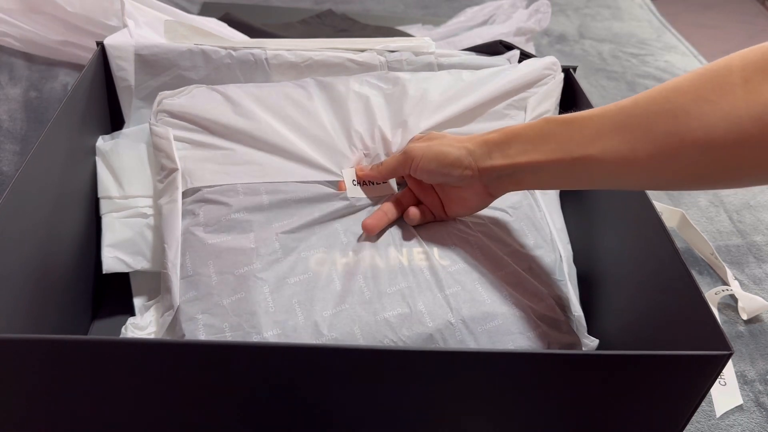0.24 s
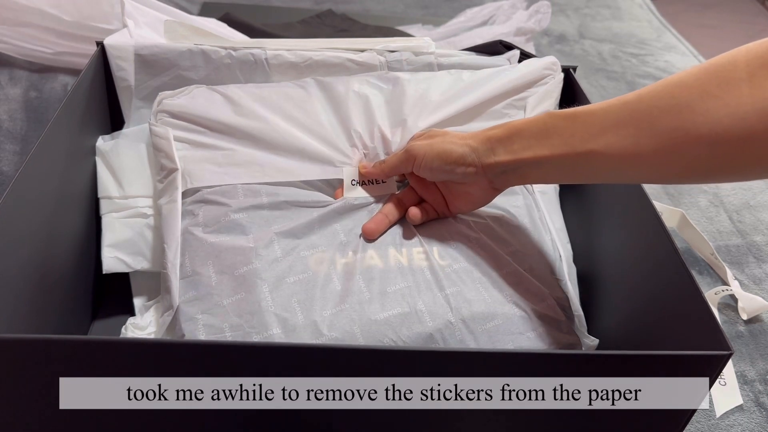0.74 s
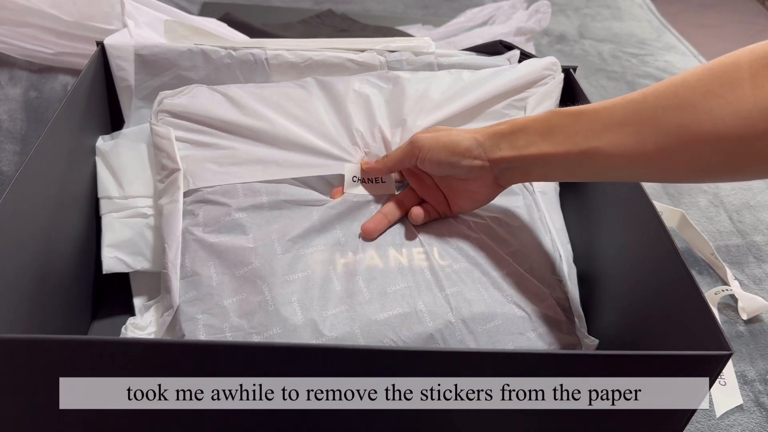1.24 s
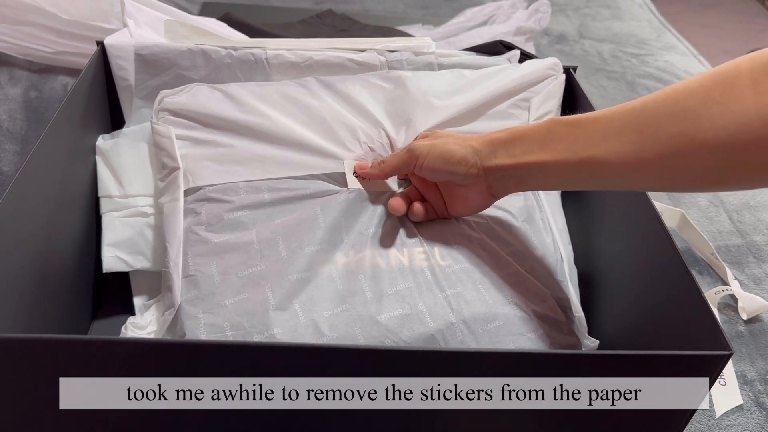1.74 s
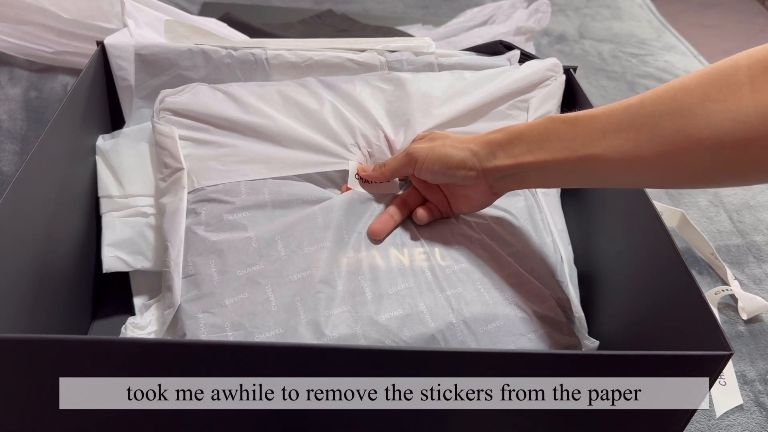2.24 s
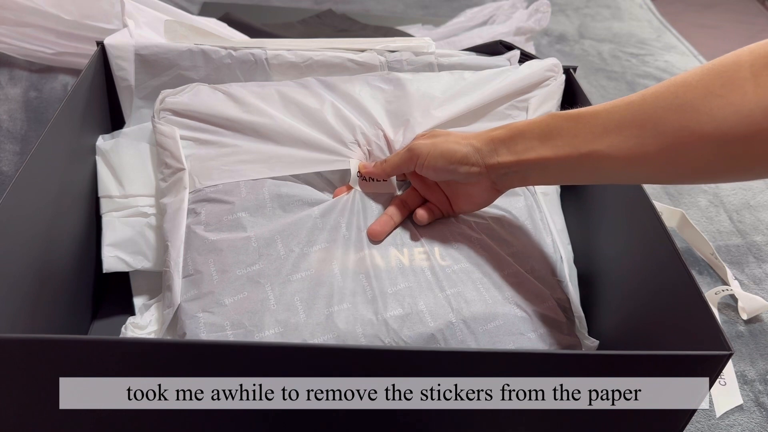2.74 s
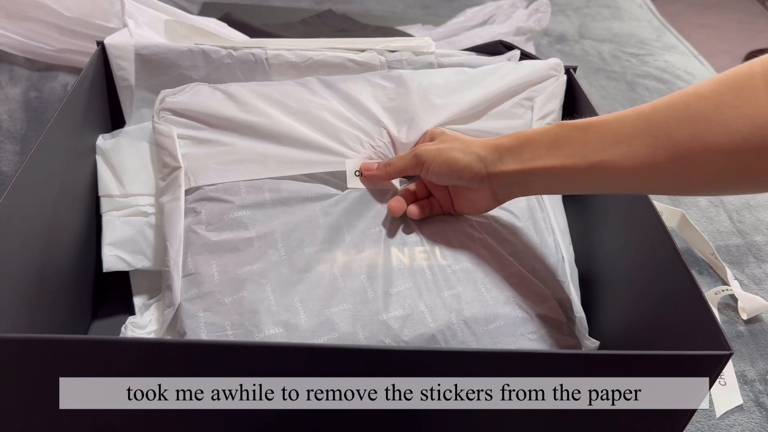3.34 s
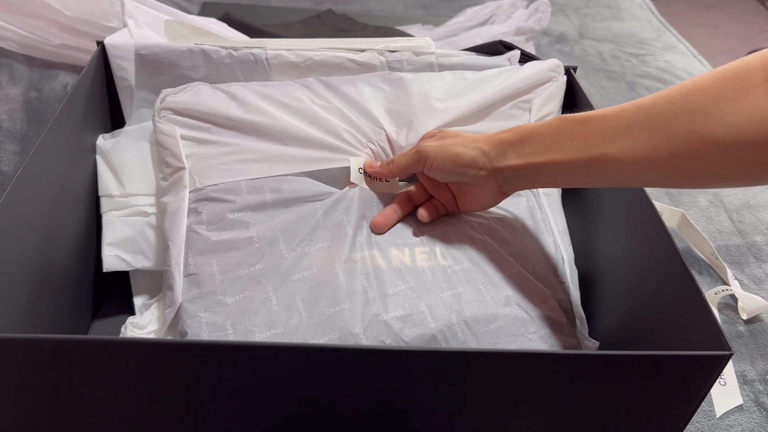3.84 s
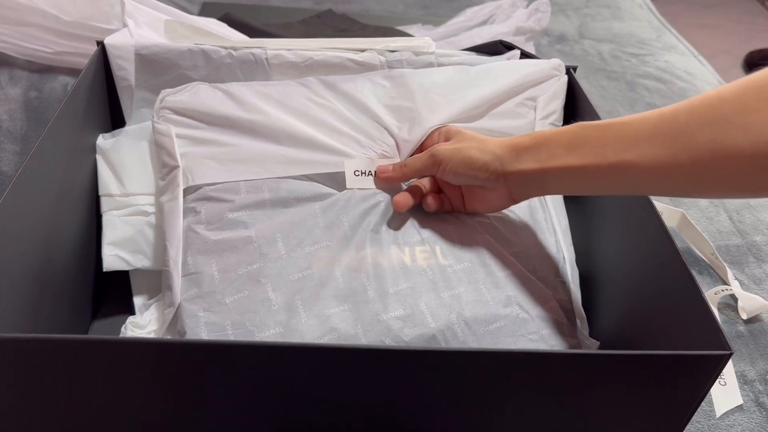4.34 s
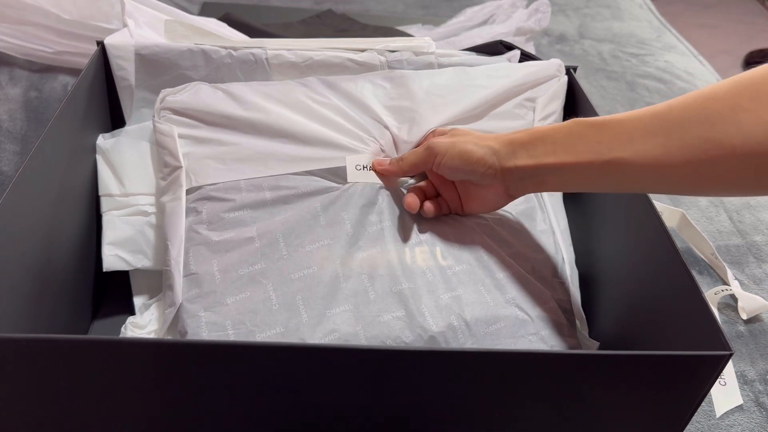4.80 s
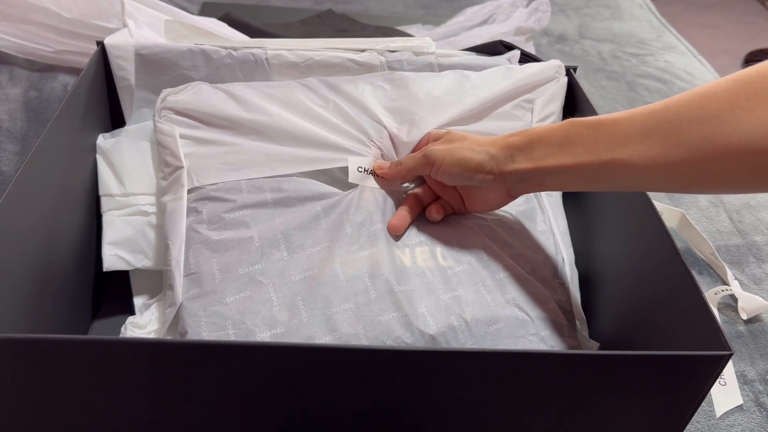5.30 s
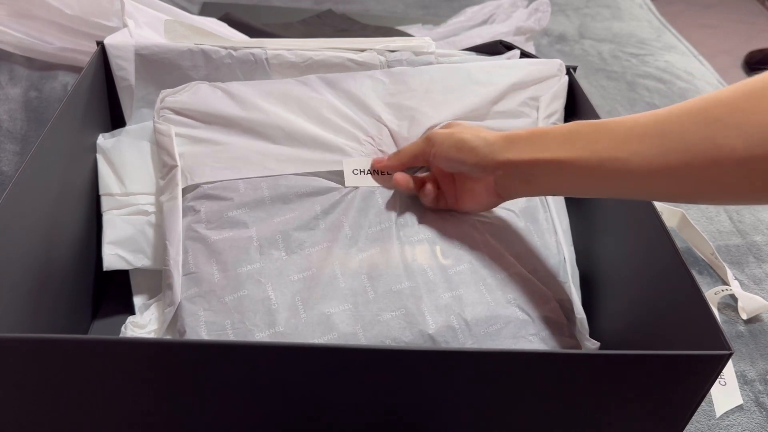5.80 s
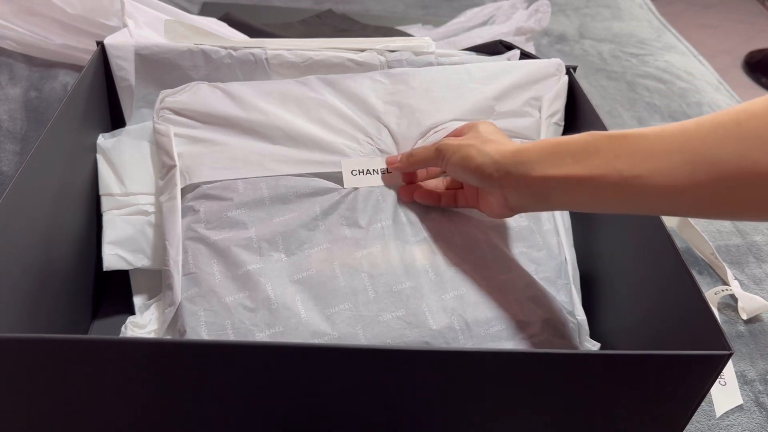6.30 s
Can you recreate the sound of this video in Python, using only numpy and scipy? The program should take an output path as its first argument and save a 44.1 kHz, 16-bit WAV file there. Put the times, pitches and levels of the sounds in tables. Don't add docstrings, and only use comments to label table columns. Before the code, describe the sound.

Dry, delicate paper crinkling heard very close, in stereo. A thumb picks under a sticker with small snaps and a low tug, then the sheet buckles and flaps more firmly, with a quick pair of dull cardboard knocks around four seconds. The loudest snap comes shortly after five, with wide creases popping, followed by gentler rustles. Quiet small room, low hum behind, little reverberation.

```python
import sys
import numpy as np
from scipy import signal
from scipy.fft import rfft, irfft, next_fast_len
from scipy.io import wavfile
from scipy.ndimage import uniform_filter1d, map_coordinates

SR = 44100
rng = np.random.default_rng(int(sys.argv[2]) if len(sys.argv) > 2 else 0)


def volts(x):
    e = np.asarray(x, float) / 20
    return 10 ** e


def unload_audio(sound):
    columns = np.transpose(np.atleast_2d(sound))
    steps = np.round(np.clip(columns, -1, 1) * 32767)
    wavfile.write(sys.argv[1], SR, steps.astype(np.int16))


N = 289296

# (frequency [Hz], density [dB per Hz])
CRISP_COLOUR = [(3800, -70), (6500, -10.5), (7500, -6.5), (8100, -6), (8800, -2), (10600, 1.5),
                (13600, -4.5), (15900, -2.5), (16300, -33), (16800, -34.5)]
# (frequency [Hz], density [dB per Hz])
DULL_COLOUR = [(240, -5.5), (400, -6.5), (572, -10), (1100, -7), (1250, -4), (1420, -5), (2690, -4.5),
               (2900, -4), (3130, -3), (8500, -4), (11000, -15), (18700, -120)]


def unit(x):
    return x / np.sqrt(np.mean(x ** 2) + 1e-20)


def along(points, hz):
    f, v = np.transpose(points)
    return np.interp(np.log(hz + 1), np.log(f + 1), v)


def wobble(rate):
    knots = rng.standard_normal(int(N * rate / SR) + 4)
    return map_coordinates(knots, [np.arange(N) * rate / SR])


def filtered(x, response):
    m = next_fast_len(N + SR // 2)
    return irfft(rfft(x, m) * response(np.fft.rfftfreq(m, 1 / SR)), m)[..., :N]


def voiced(envelope, colour, pair=None):
    if pair is None:
        pair = rng.standard_normal((2, N))
    grid_hz = np.linspace(0, SR / 2, num=4096)
    norm = np.sqrt(np.mean(volts(along(colour, grid_hz)) ** 2))
    return filtered(envelope * pair, lambda hz: volts(along(colour, hz)) / norm)


def room_hum():
    # (frequency [Hz], density [dB per Hz])
    hum_colour = [(15, -35), (40, -12), (75, 0), (119, -9), (189, 11.5), (413, -31), (580, -2.5),
                  (1270, -3.5), (3000, -10), (3900, -97), (6600, -120)]
    return voiced(volts(-66.5 + 0.53 * wobble(3.55)), hum_colour)


def room_answer(pair):
    # (frequency [Hz], time to fall 60 dB [s])
    decay_times = [(200, 0.12), (2000, 0.24), (12000, 0.12)]
    hz, t, z = signal.stft(rng.standard_normal((2, SR // 3)), SR, nperseg=256)
    decay = volts(-60 * t / along(decay_times, hz)[:, None])
    tail = signal.istft(z * decay, SR, nperseg=256)[1]
    tail = tail / np.linalg.norm(tail[0])
    return signal.fftconvolve(pair[:1], tail, axes=1)[:, :N]


def hand_weight():
    # (time [s], weight [dB])
    lean = [(0, -61), (.84, -61), (1, -57), (1.5, -56), (1.78, -49), (1.99, -63), (2.55, -60.5),
            (2.8, -53.5), (3.15, -62), (3.45, -53.5), (3.8, -44), (4.16, -59), (4.7, -75), (4.93, -53),
            (5.15, -55.5), (5.59, -46), (6.16, -66.5), (6.56, -89)]
    s, db = np.transpose(lean)
    return np.interp(np.arange(N) / SR, s, db)


def box_wall(weight_db):
    # (frequency [Hz], density [dB per Hz])
    panel_colour = [(120, -16), (200, -3), (420, -3), (600, -20), (900, -51)]
    wall_db = -64 + 0.24 * (weight_db - weight_db.mean())
    return voiced(volts(wall_db - 1.2 + 2.6 * wobble(30)), panel_colour)


def sheet_sway(weight_db):
    # (frequency [Hz], density [dB per Hz])
    sway_colour = [(15, -43), (28, -13), (55, 7.5), (70, 1.5), (170, -9), (400, -29), (520, -52),
                   (880, -120)]
    return voiced(volts(weight_db + 0.5 + 3.7 * np.tanh(wobble(25))), sway_colour)


def lid_knocks():
    # (time [s], level [dB])
    lid_taps = [
        (1.465, -27),
        (3.426, -29),
        (3.92, -24.5),
        (4.072, -19),
        (4.112, -23.5),
        (5.132, -20.5),
        (5.396, -45),
        (5.708, -51),
    ]
    # (frequency [Hz], density [dB per Hz])
    board_colour = [(90, -43), (200, -2), (450, -4), (700, -18.5), (1500, -12), (3000, -22), (7000, -45)]
    taps = np.zeros(N)
    for s, db in lid_taps:
        taps[round(s * SR)] = volts(db + 25.5)

    def board(hz):
        return volts(along(board_colour, hz)) * np.exp(-2j * np.pi * 1.9 * np.log(hz + 30))

    chirp = filtered(taps, board)
    return np.array([chirp, .5 * np.roll(chirp, shift=40)])


def sheet_flaps():
    # (time [s], peak [dB], pitch [Hz], length [s])
    tugs = [(.914, -47, 63.4, 0.024), (1.012, -42, 109, 0.014), (1.053, -46, 53, 0.041),
            (1.316, -41, 88.5, 0.023), (1.38, -41, 59, 0.018), (1.641, -35.5, 73, .016),
            (1.661, -33.5, 97, 0.0081), (1.704, -21.5, 68.6, 0.019), (1.736, -23, 70, 0.024),
            (1.819, -44, 59, .017), (2.63, -37, 58, 0.02), (2.822, -36.5, 81.6, 0.027),
            (2.856, -40, 75.4, 0.029), (3.311, -41.5, 55.6, 0.051), (3.621, -27.5, 110, 0.018),
            (3.643, -30.5, 76.6, 0.019), (3.827, -30.5, 110, 0.0082), (3.761, -37.5, 70, 0.03),
            (3.848, -28, 64.4, 0.047), (3.898, -34.5, 90, 0.018), (4.02, -37.5, 66, 0.028),
            (4.1, -33, 109, 0.016), (4.908, -39.5, 82, 0.015), (5.296, -37, 74, 0.02),
            (5.4, -36, 151, 0.0081), (5.492, -32.5, 87, 0.0064), (5.543, -28, 136, .0053),
            (5.56, -39, 90, 0.085), (5.712, -34, 116, 0.0081), (5.82, -40, 79.5, 0.031),
            (2.481, -51, 126, .02), (4.832, -49.5, 124, 0.021), (0.498, -53.5, 102, .03),
            (1.3, -52, 135, .015), (4.31, -51, 250, .02), (2.42, -54, 248, .02)]
    # (time [s], peak [dB])
    thumps = [
        (1.476, -42.5),
        (3.924, -42.5),
        (4.079, -38.5),
        (4.125, -41.5),
        (5.14, -30.5),
        (5.182, -45),
        (5.201, -45.5),
    ]
    # (time [s], peak [dB])
    nudges = [(.967, -48.5), (1.299, -44), (1.437, -47), (1.53, -51), (1.87, -44), (2.78, -44), (3.12, -53),
              (3.677, -38), (4.155, -41), (4.943, -43), (5.617, -45), (4.5, -52.5)]
    events = tugs + [(s, db, 237, 0.01) for s, db in thumps] + [(s, db, 70, 0.025) for s, db in nudges]
    out = np.zeros(N + SR)
    t = np.arange(-4410, 8820) / SR
    for s, db, hz, length in events:
        u = t / length
        rise = np.exp(-(u / 0.44) ** 2)
        fall = np.exp(-u / 1.04) if hz > 180 else np.exp(-(u / 0.67) ** 2)
        shape = np.where(u < 0, rise, fall)
        sag = 0.52 * length * np.log(np.cosh(np.clip(u, -1.5, 1.5)))
        phase = 2 * np.pi * hz * (t - sag) + 4.63 * rng.random()
        out[round(s * SR):][:len(t)] += volts(db + 3.5) * shape * np.cos(phase)
    tug = out[4410:4410 + N]
    return np.array([tug, 0.3 * np.roll(tug, shift=150)])


def fold_pops():
    # (time [s], peak [dB], pitch [Hz])
    pops = [
        (1.9405, -31, 3620),
        (2.161, -21.5, 3800),
        (2.540, -29, 3900),
        (5.1343, -12, 2960),
        (5.1336, -17, 955),
        (5.191, -18.5, 3080),
        (5.196, -17.5, 3320),
        (5.287, -29, 4250),
    ]
    out = np.zeros(N + SR)
    t = np.arange(1500) / SR
    for s, db, hz in pops:
        ring = np.sin(2 * np.pi * hz * t) + 0.52 * np.sin(2 * np.pi * 1.3 * hz * t)
        fade = volts(-60 * t / .007) * (1 - np.exp(-t / .0003))
        out[round(s * SR):][:len(t)] += volts(db + 0.5) * fade * ring
    return np.array([out[:N], np.roll(out[:N], shift=23)])


def tinted(patchy_db):
    z = signal.stft(rng.standard_normal((2, N)), nperseg=128)[2]
    field = uniform_filter1d(rng.standard_normal(z.shape[1:]), size=4, axis=0)
    field = unit(uniform_filter1d(field, size=5, axis=1))
    return unit(signal.istft(z * volts(patchy_db * field), nperseg=128)[1][:, :N])


def strain():
    # (time [s], peak strain [dB], build-up [s], let-go [s])
    pulls = [(.15, -49, 0.082, 0.052), (0.269, -51, 0.063, 0.056), (.47, -49.5, 0.11, 0.12),
             (.8, -53, 0.019, 0.03), (.87, -61.5, 0.026, 0.1), (.97, -51.5, 0.015, 0.058),
             (1.11, -59.5, 0.12, 0.2), (1.281, -45, 0.052, 0.15), (1.47, -44, 0.061, 0.14),
             (1.698, -46.5, 0.064, 0.12), (1.931, -53, 0.12, 0.11), (2.16, -50.5, 0.051, 0.14),
             (2.34, -52, 0.049, 0.056), (2.44, -55.5, 0.019, 0.051), (2.57, -53, 0.04, 0.065),
             (2.812, -42, 0.032, 0.13), (3.07, -51.5, 0.028, 0.087), (3.31, -44.5, 0.052, 0.27),
             (3.561, -42.5, 0.024, 0.052), (3.79, -54, 0.12, 0.22), (4.137, -45, 0.034, 0.31),
             (4.32, -39, 0.035, 0.018), (4.41, -49, 0.056, 0.14), (4.64, -47, 0.064, 0.094),
             (4.88, -52.5, 0.11, 0.13), (5.139, -42.5, 0.019, 0.095), (5.5, -51, 0.12, 0.1),
             (5.66, -50, 0.074, 0.074), (5.77, -46, 0.049, 0.077), (5.83, -48, 0.074, .08),
             (5.94, -45, 0.15, 0.058), (6.02, -50.5, .04, 0.08), (6.11, -52, 0.071, 0.14),
             (6.39, -45, 0.15, 0.28), (.345, -55, .04, .05), (.4, -56, .03, .04), (.07, -51, 0.12, 0.09),
             (2.72, -65.5, 0.026, 0.025), (2.9, -50, 0.036, 0.09), (3.42, -57, .05, 0.065),
             (3.51, -53, 0.044, 0.032), (4.02, -60, .04, .04), (4.49, -55, .03, 0.046),
             (5.3, -47, 0.06, 0.09), (5.39, -51, 0.028, 0.1), (6.5, -61, .04, 0.041),
             (1.53, -45.5, 0.05, 0.041)]
    slope_db, slack_db = 13, -86
    t = np.arange(0, N + 16, step=16) / SR
    power = volts(slack_db) ** 2
    for s, db, up, down in pulls:
        times_away = np.where(t < s, (s - t) / up, (t - s) / down)
        power = power + volts(db - slope_db * times_away) ** 2
    return np.interp(np.arange(N) / SR, t, 10 * np.log10(power))


def crackle(rate, spread_db, life_ms, clump_db):
    draw = rng.random((2, N))
    size_db = spread_db * np.minimum(-np.log(draw[1] + 1e-9), 2.1)
    sizes = (draw[0] < rate / SR) * volts(size_db)
    t = np.arange(-400, 401) / SR * 1000
    fade = np.exp(-np.abs(t) / np.where(t < 0, 1.14 * life_ms, life_ms))
    clumps = volts(clump_db * 1.1 * np.tanh(wobble(45)))
    burst = unit(clumps * signal.fftconvolve(sizes, fade, "same"))
    local_power = uniform_filter1d(uniform_filter1d(burst ** 2, size=1500), size=1500)
    local_power = np.abs(local_power) + 1e-3
    return unit(burst / local_power ** .35)


def rustle(paper):
    # (time [s], dull body [dB], reach [s])
    spreads = [
        (5.95, 2.5, 0.18),
        (2.69, -3, .1),
        (6.42, -1.5, 0.15),
        (3.3, 1.5, .08),
        (4.6, 1.5, 0.089),
        (1.05, -1.5, 0.086),
        (1.98, -1, .08),
        (0.68, -2.5, 0.074),
        (5.3, 1, 0.087),
    ]
    crisp_db = strain()
    over_db = crisp_db + 54
    dull_db = -54 + 0.81 * over_db
    for s, db, reach in spreads:
        dull_db = dull_db + db * np.exp(-((np.arange(N) / SR - s) / reach) ** 2)
    fine = crackle(500, spread_db=6.0, life_ms=0.76, clump_db=3.5)
    broad = crackle(500, spread_db=0.0, life_ms=2.2, clump_db=7.0)
    grain = .4 * volts(.3 * over_db) + fine + .35 * broad
    swell = wobble(22)
    crisp = volts(crisp_db + 2.0 + 0.62 * swell) * unit(grain)
    dull = volts(dull_db + 4.0 + 1.0 * swell) * unit(0.83 + 0.61 * fine + 0.67 * broad)
    return voiced(crisp, CRISP_COLOUR, paper) + voiced(dull, DULL_COLOUR, paper[::-1])


def snap_events():
    # (time [s], peak [dB], length [ms])
    glue = [(.0207, -30, 1.4), (.0653, -33.5, 2.7), (.1158, -26.5, 1.4), (.49, -33, 3.7), (.5462, -31, 2.3),
            (.856, -25.5, 1.1), (.968, -33, 2.6), (1.0947, -25, 0.86), (1.3954, -34, 4.2),
            (1.4682, -28, 1.4), (1.8142, -33, 1.9), (2.2372, -30, 2.2), (2.4169, -29.5, 3.3),
            (2.4201, -39, 1.36), (3.1171, -28, 2.15), (3.4272, -28, 1.4), (3.4417, -39, 2.3),
            (3.7148, -34.5, 1.7), (3.9451, -34, 1.8), (4.393, -25, 5), (4.4439, -24.5, 1.9),
            (4.4744, -34.5, 2), (4.6093, -31.5, 2.2), (4.9611, -30, 1.6), (5.6266, -33, 1.9),
            (5.946, -28.5, 1.8), (6.0209, -41, 1.4), (6.0742, -36, 1.8), (6.289, -34, 3.7),
            (6.3973, -25.5, 3), (5.1322, -17.5, 3)]
    # (time [s], peak [dB], length [ms])
    creases = [(.0105, -32, 2.8), (.1517, -30, 2.7), (.1686, -28, 1.5), (.2831, -32, 4.4),
               (.3926, -37.5, 1.8), (.534, -30.5, 1.65), (.7863, -29, 1), (1.3402, -36.5, 3.4),
               (1.638, -34, 1.7), (2.151, -35, 4.4), (2.162, -29, 2.5), (2.3253, -36, 2.6),
               (2.3758, -44.5, 3.1), (2.5306, -29, 1.7), (2.5399, -35, 4.4), (2.5686, -34, 4.4),
               (2.7975, -32.5, 3.9), (2.97, -36, 3.2), (3.2449, -30, 1.64), (3.4346, -33, 3.5),
               (4.184, -28.5, 2.2), (4.8615, -33.5, 2.4), (4.9859, -28.5, 1.5), (5.033, -32.5, 1.1),
               (5.2887, -34.5, 3.3), (5.3306, -34, 2.7), (5.7625, -36, 4.3), (6.1299, -34.5, 3),
               (2.7, -45, 2.7), (6.255, -34.5, 13.5), (2.8495, -32.5, 4.7), (2.7915, -36, 3),
               (6.3535, -40, 5.2)]
    # (time [s], peak [dB], length [ms])
    buckles = [(.1832, -37.5, 2.4), (.584, -46.5, 5.8), (.9177, -41.5, 1.7), (.9573, -38.5, 2.2),
               (1.0353, -44, 4), (1.525, -41, 2.2), (1.9017, -37.5, 2), (1.942, -33.5, 2),
               (2.054, -50, 4.7), (2.2537, -40, 1.2), (2.308, -35, 1.3), (2.4675, -48, 2.8),
               (3.0362, -34.5, 2), (3.7653, -37, 1.65), (3.9199, -43.5, 3.8), (3.9932, -40.5, 2.4),
               (4.0733, -46, 3.9), (4.6836, -41.5, 4.5), (4.7795, -40.5, 3.1), (4.901, -36, 1.6),
               (4.9399, -39, 3.4), (5.057, -38, 8.4), (5.1341, -20.5, 4.8), (5.1907, -26.5, 2),
               (5.2583, -35, 2.1), (6.0941, -45, 1.2), (6.4752, -31, 2), (6.4967, -42.5, 4.7),
               (6.5579, -36, 2.3)]
    # (time [s], peak [dB])
    picks = [(.6897, -53), (.71, -44), (.8632, -45), (.936, -56), (1.13, -47.5), (1.237, -38.5),
             (1.564, -39), (1.5967, -38), (1.676, -41), (2.128, -45), (2.647, -45), (2.6822, -45),
             (2.9074, -34.5), (2.9574, -45), (3.1988, -52), (3.6483, -39), (3.857, -39), (3.8716, -42),
             (3.9608, -44), (4.055, -39), (4.9167, -39), (4.955, -35.5), (4.993, -43), (5.0051, -58),
             (5.365, -45), (6.0053, -47), (6.05, -40), (6.125, -36.5), (6.1974, -40), (6.335, -35)]
    # (time [s],
    # peak [dB])
    ticks = [(0.0266, -38), (0.0776, -34), (0.1334, -33), (0.2444, -36), (0.2741, -41),
             (0.3368, -40.5), (0.3507, -35.5), (0.4098, -42.0), (0.458, -43.0), (0.6425, -56),
             (0.6523, -55.0), (0.753, -53), (0.7807, -45), (0.8176, -48.0), (0.9, -39.5),
             (0.9431, -55), (1.0184, -45), (1.0414, -44), (1.0489, -46.0), (1.0531, -47.0),
             (1.0671, -52), (1.1299, -45), (1.1896, -40.5), (1.2093, -45), (1.2192, -48.0),
             (1.2626, -39), (1.291, -33), (1.4445, -33), (1.449, -36), (1.4634, -34), (1.5669, -37),
             (1.6243, -45), (1.664, -44), (1.698, -35), (1.816, -39), (1.8184, -47), (1.9199, -49),
             (1.9461, -43.0), (1.9728, -41), (1.9765, -40), (2.0157, -45), (2.0508, -44.5),
             (2.0825, -49), (2.1077, -46.0), (2.2302, -38), (2.2534, -43), (2.2948, -43),
             (2.302, -40), (2.4976, -51.0), (2.515, -45), (2.598, -38), (2.6378, -49), (2.7044, -44),
             (2.7091, -45), (2.7345, -50.0), (2.755, -51), (2.8054, -32.0), (2.8937, -35),
             (2.9573, -37), (3.0438, -40),
             (3.0525, -39.0), (3.0605, -43), (3.1995, -47), (3.2224, -50.0), (3.2397, -40),
                  (3.2493, -32.0), (3.3332, -35.0), (3.4419, -35), (3.518, -47), (3.5504, -37.0),
                  (3.5928, -41.0), (3.6218, -44), (3.6998, -48.0), (3.7275, -46.0), (3.8797, -47),
                  (3.8989, -47.0), (3.9315, -48.0), (4.0084, -48), (4.0438, -46.0), (4.1523, -35.0),
                  (4.4045, -34), (4.413, -35), (4.4965, -37), (4.5073, -42), (4.5561, -49), (4.5756, -49),
                  (4.5801, -37.5), (4.623, -33.0), (4.6706, -37), (4.7647, -47.0), (4.8208, -40.0),
                  (4.8318, -44.0), (5.044, -36.5), (5.2408, -43.0), (5.3142, -39.0), (5.3637, -39),
                  (5.3813, -39), (5.5247, -40.0), (5.5619, -47), (5.6078, -44.0), (5.616, -44),
                  (5.6457, -37.0), (5.6572, -35.5), (5.7085, -42.0), (5.7155, -39), (5.8205, -40),
                  (5.8253, -44), (5.8954, -40), (5.9383, -33.0), (6.0049, -40), (6.0208, -40),
                  (6.0457, -37), (6.0966, -37.0), (6.2375, -34), (6.336, -33.0), (6.3551, -35),
                  (6.3825, -35), (6.4922, -36.0), (6.502, -37), (6.5284, -45)]
    # (time [s], peak [dB])
    pockets = [(0.325, -58.0), (0.3373, -53.5), (0.4388, -49), (0.443, -52), (0.6904, -60), (0.7058, -57.5),
               (0.862, -63), (0.936, -63), (1.0954, -53.5), (1.1305, -53), (1.4724, -50.0), (1.5668, -51.5),
               (1.6753, -48.5), (1.6947, -58), (1.7065, -50), (1.798, -59), (1.8373, -57), (1.8762, -58),
               (2.1282, -57), (2.326, -52), (2.4674, -54.5), (3.0439, -50), (3.0546, -55.0), (3.0617, -58),
               (3.2229, -59), (3.251, -57), (3.3305, -51), (3.3644, -50.0), (3.4427, -54.5), (3.6674, -62),
               (3.845, -62), (4.0114, -56), (4.032, -54), (4.1415, -45.5), (4.2159, -55), (4.315, -54),
               (4.3696, -49), (4.4506, -58), (4.4741, -57), (4.5709, -50.5), (4.6093, -46.5), (4.6544, -57),
               (4.7647, -54), (4.7744, -53), (4.831, -59), (5.004, -57.0), (5.258, -50), (5.472, -53),
               (5.5232, -51), (5.6215, -52), (5.75, -53), (5.8175, -50.0), (5.827, -53), (5.9612, -48),
               (6.1462, -52)]
    events = []
    for rows, dull_db in [(glue, -13), (creases, -7), (buckles, -2.5)]:
        events += [(s, db, length_ms, dull_db) for s, db, length_ms in rows]
    for rows, length_ms, dull_db in [(picks, 2.37, -5.5), (ticks, 2.04, -10), (pockets, 2.03, 10.5)]:
        events += [(s, db, length_ms, dull_db) for s, db in rows]
    return events


def snaps(paper):
    crisp, dull = np.zeros(N + SR), np.zeros(N + SR)
    t = np.arange(-441, 1764) / SR * 1000
    after = np.maximum(t, 0)
    for s, db, length_ms, dull_db in snap_events():
        span = max(length_ms - .9, .3)
        rise = np.exp(-(np.minimum(t, 0) / min(0.74 * span, 1.8)) ** 2)
        at = slice(round(s * SR), round(s * SR) + len(t))
        crisp[at] += (volts(db) * rise * np.exp(-after / (0.73 * span))) ** 2
        dull[at] += (volts(db + dull_db + 0.5) * rise * np.exp(-after / (1.65 * span))) ** 2
    lead = slice(441, 441 + N)
    return voiced(np.sqrt(crisp[lead]), CRISP_COLOUR) + voiced(np.sqrt(dull[lead]), DULL_COLOUR, paper)


def microphones(pair):
    # (frequency [Hz], correlation [0-1])
    alike = [(60, 0.97), (300, 0.99), (700, 0.4), (2500, 0.82), (4000, 0.14), (6000, 0.1), (8000, 0.67),
             (11000, 1)]
    # (frequency [Hz], phase [rad])
    left_lead = [(60, -.6), (130, -.55), (300, -.15), (700, .7), (1400, -.4), (2500, .8), (4000, 1.5),
                 (8000, 2.6), (9700, .8), (11000, 0), (13500, -.6), (15600, -2.2)]
    # (frequency [Hz], level [dB])
    left_level = [(60, 0.5), (110, 0), (200, 3.5), (380, -1), (700, 3), (1290, 5.5), (2380, -1),
                  (4400, 4.5), (8120, -2.5), (15000, 0.5)]

    def shares(hz):
        turn = np.arccos(np.clip(along(alike, hz), -1, 1)) / 2
        return np.array([np.cos(turn), np.sin(turn)])

    def tilts(hz):
        left = volts(along(left_level, hz) / 2) * np.exp(.5j * along(left_lead, hz))
        return np.array([left, 1 / left])

    mid, side = filtered(pair, shares)
    return filtered(np.array([mid + side, mid - side]), tilts)


def scene():
    paper = tinted(patchy_db=1.55)
    weight_db = hand_weight()
    sharp = snaps(paper[:, ::-1])
    box = box_wall(weight_db) + lid_knocks()
    sheet = sheet_sway(weight_db) + sheet_flaps() + fold_pops() + rustle(paper)
    return microphones(room_hum() + box + sheet + sharp) + volts(-7) * room_answer(sharp)


def low_pass(x):
    return signal.sosfilt(signal.butter(12, 16810, fs=SR, output="sos"), x)


def record(dry):
    edge_hz, busy_edge_hz = 16000, 15350
    busy_db, sudden_db = -42.5, 10
    power = filtered(dry[0], lambda hz: hz > 3000) ** 2
    slow = np.abs(uniform_filter1d(power, size=3000))
    fast = np.abs(uniform_filter1d(power, size=100))
    busy = uniform_filter1d(1. * (slow > volts(busy_db) ** 2), size=700)
    sudden = uniform_filter1d(300. * (fast > slow * volts(sudden_db) ** 2), size=500)
    sudden = np.clip(sudden, 0, 1)
    top = filtered(dry, lambda hz: hz > edge_hz)
    rim = filtered(dry, lambda hz: hz > busy_edge_hz) - top
    mix = dry - (1 - sudden) * (top + busy * rim)
    return low_pass(mix)


dry = scene()
out = record(dry)
unload_audio(out)
```